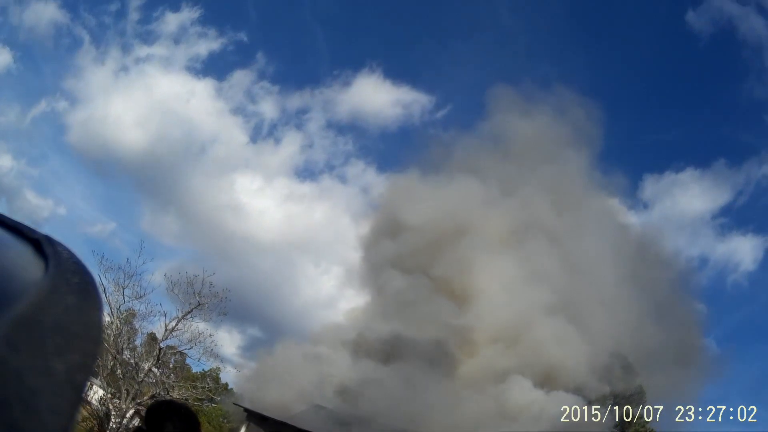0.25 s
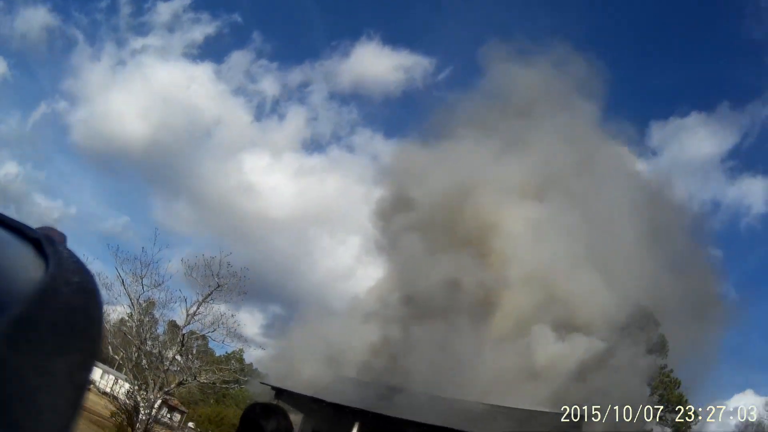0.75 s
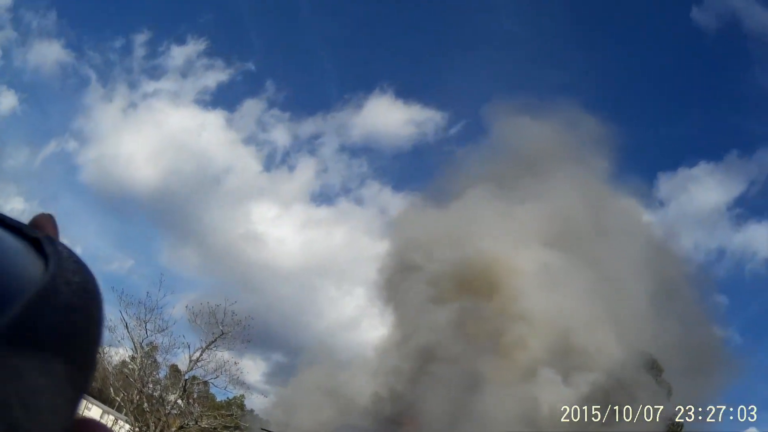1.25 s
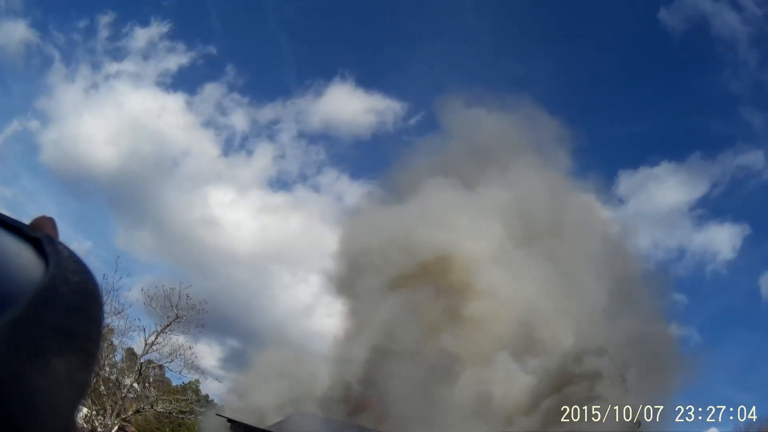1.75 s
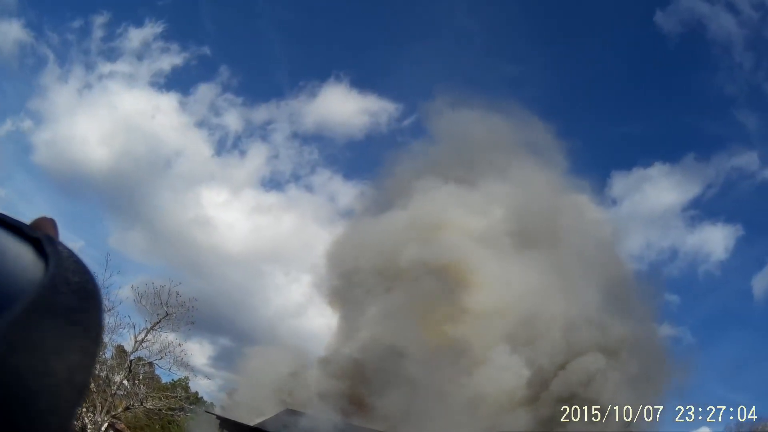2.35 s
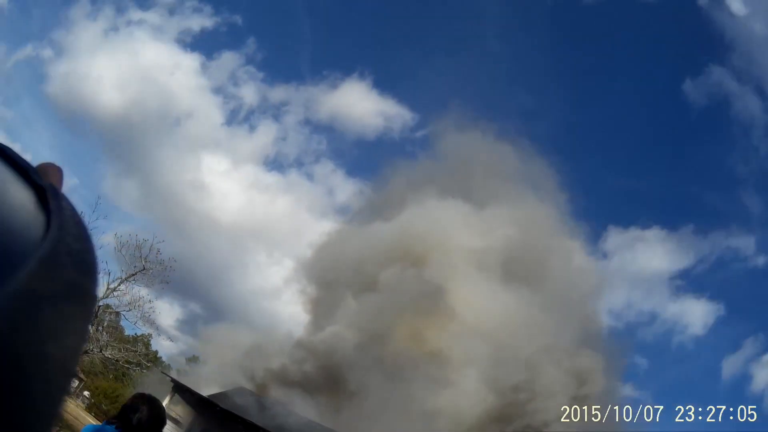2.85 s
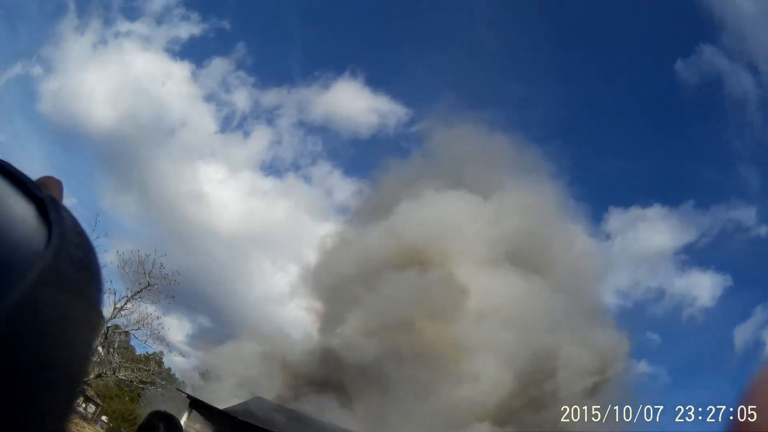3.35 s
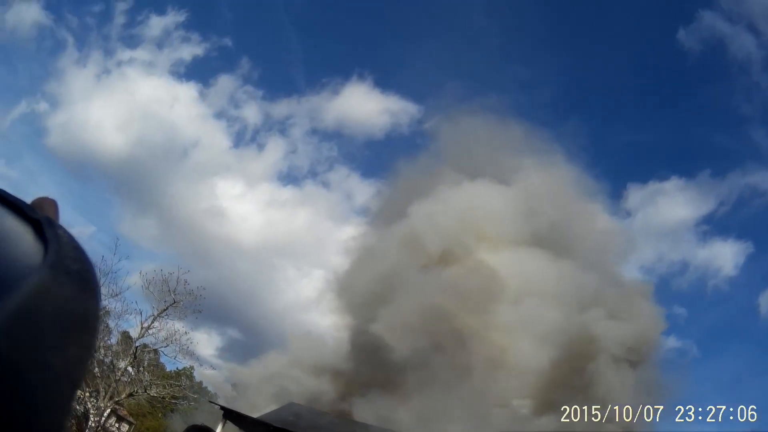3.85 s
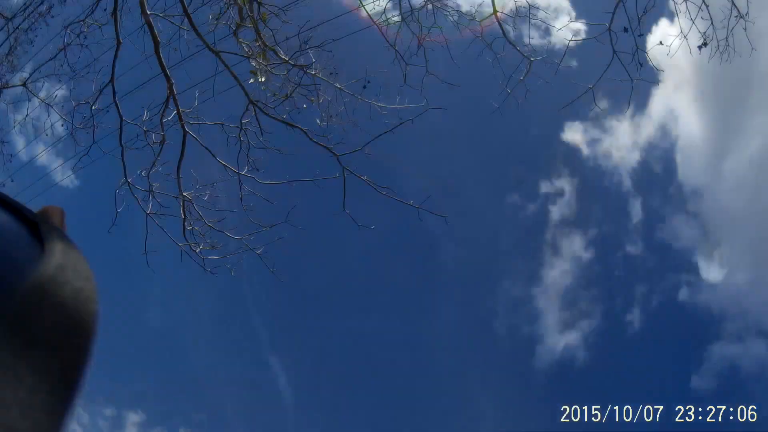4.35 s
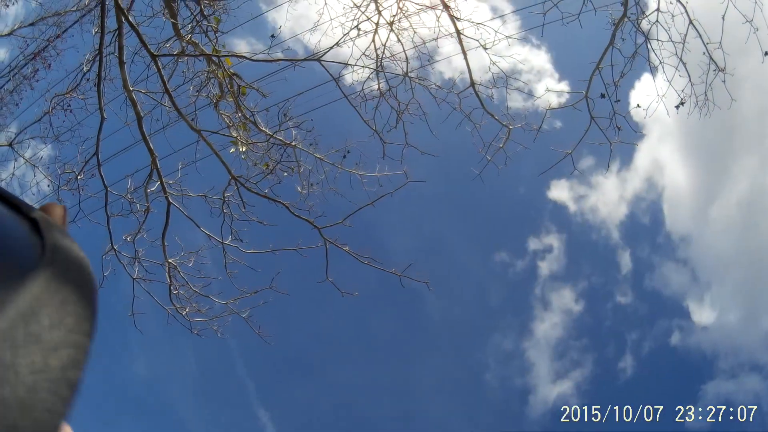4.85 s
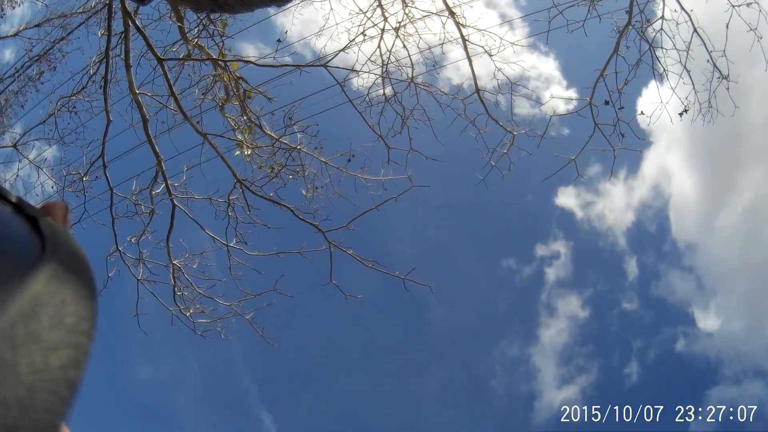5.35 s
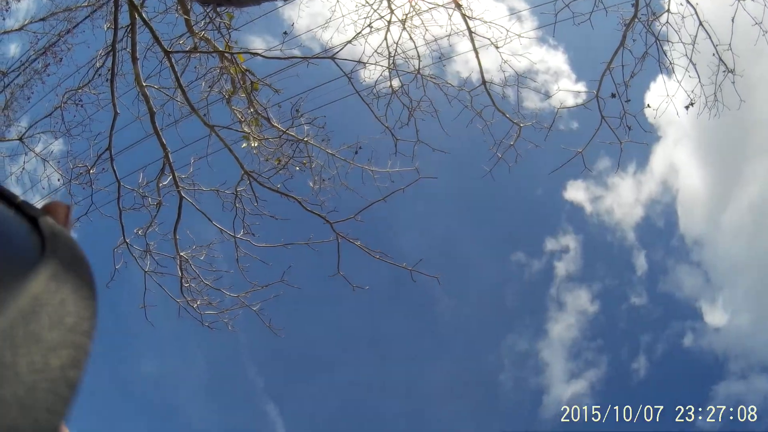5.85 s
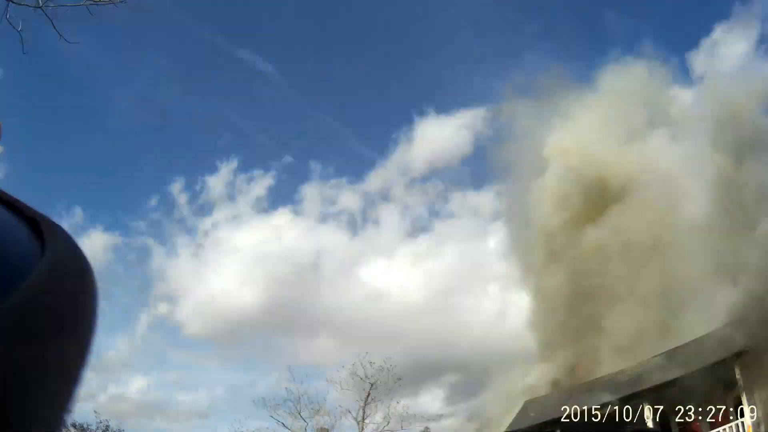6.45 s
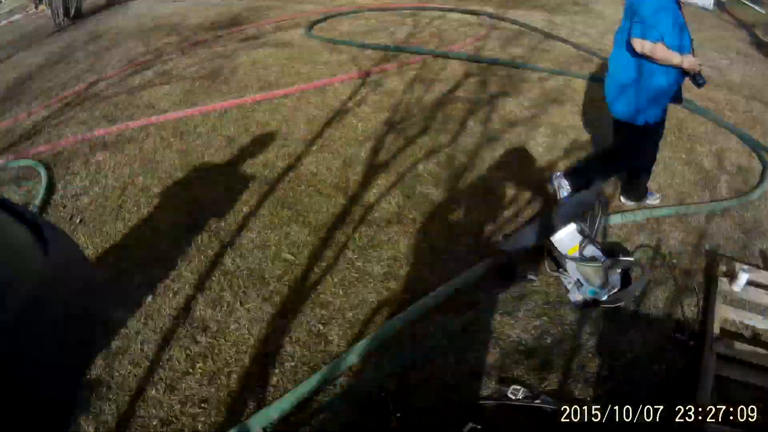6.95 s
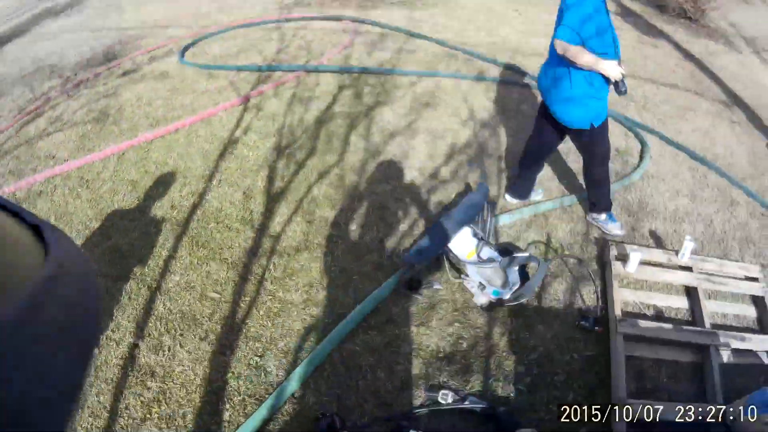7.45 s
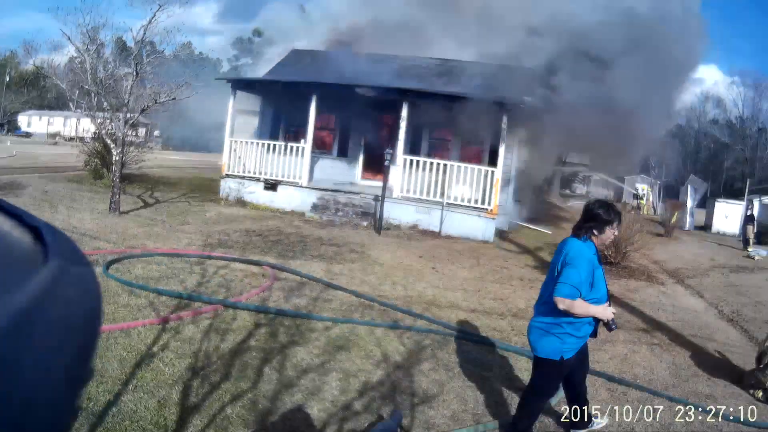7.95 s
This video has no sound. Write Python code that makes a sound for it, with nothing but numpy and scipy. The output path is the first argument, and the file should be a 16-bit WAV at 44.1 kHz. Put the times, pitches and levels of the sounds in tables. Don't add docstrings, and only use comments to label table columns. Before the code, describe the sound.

Steady low diesel hum and boxy roar of a pumping fire engine, with sharp gloved knocks, clicks and a hard snap right at the microphone.

```python
import sys
import numpy as np
from scipy import signal
from scipy.io import wavfile

SR = 44100
rng = np.random.default_rng(int(sys.argv[2]) if len(sys.argv) > 2 else 0)


def materialize(psi):
    bounded = np.clip(np.atleast_2d(psi).T, -1, 1)
    quanta = np.round(bounded * 32767).astype(np.int16)
    wavfile.write(sys.argv[1], SR, quanta)


def rack_gain(trim_db):
    fader = np.asarray(trim_db, float)
    return 10 ** (fader / 20)


N = 362061

# (f/Hz, width/Hz, level/dB)
LOW_CAVITY = [(1080, 336, 7.5), (1377, 375, 12.5), (1539, 252, 14), (1946, 680, -5.5)]


def rms_one(x):
    return x / np.sqrt(np.mean(x ** 2) + 1e-20)


def in_time(rows):
    s, *columns = np.transpose(rows)
    return [np.interp(np.arange(N) / SR, s, c) for c in columns]


def drift(rate):
    r = np.exp(-80 * np.pi * rate / SR)
    steps = rng.standard_normal(N // 40 + 2002)
    slow = signal.lfilter([1], [1, -2 * r, r * r], steps)[2000:]
    return np.interp(np.arange(N) / 40, np.arange(len(slow)), rms_one(slow))


def resonate(x, hz, width_hz):
    r = np.exp(-np.pi * width_hz / SR)
    zeros = np.array([1, 0, -1]) * (1 - r * r) / 2
    poles = [1, -2 * r * np.cos(2 * np.pi * hz / SR), r * r]
    return signal.lfilter(zeros, poles, x)


def cavity(x, modes):
    return sum((-1) ** k * rack_gain(db) * resonate(x + 1e-18, hz, width)
               for k, (hz, width, db) in enumerate(modes))


def band_pass(x, order, low_hz, high_hz):
    return signal.sosfilt(signal.butter(order, [low_hz, high_hz], "band", fs=SR, output="sos"), x)


def tone(hz, db, wobble_db, wander):
    phase = 2 * np.pi * np.cumsum(hz * np.ones(N)) / SR + wander * drift(2.34) + rng.uniform(0, 2 * np.pi)
    return np.sqrt(2) * rack_gain(db + wobble_db * drift(4.3)) * np.sin(phase)


def add(out, s, piece):
    at = round(s * SR)
    out[at:at + len(piece)] += piece[:N - at]


def grains(count, per_s, spread_db):
    hits = rng.random(count) < per_s / SR
    sizes = rack_gain(spread_db * np.minimum(rng.exponential(1, count), 3.5))
    return hits * sizes * rng.choice([-1, 1], count)


def under(s, db, sound):
    t = s[0] + np.arange(round((s[-1] - s[0]) * SR)) / SR
    return rack_gain(np.interp(t, s, db)) * rms_one(sound[:len(t)]) * signal.windows.tukey(len(t), .04)


def follow(mean_db, share):
    # (t/s, level/dB)
    facing = [(0.0, -54), (0.98, -54.5), (1.26, -50.5), (1.76, -50.5), (2.08, -54.5), (3.66, -50.5),
              (3.95, -54), (4.11, -48), (4.28, -44.5), (4.69, -49), (5.97, -47), (6.38, -48), (6.79, -47.5),
              (7.11, -49.5), (7.43, -50), (8.21, -49)]
    facing_db, = in_time(facing)
    return mean_db + share * (facing_db - facing_db.mean())


def engines():
    # (t/s, shaft turns/s, firing order level/dB)
    throttle = [
        (0, 22.6, -40),
        (.55, 22.8, -39),
        (1, 23, -39),
        (1.5, 24, -37.5),
        (2.2, 24.6, -36),
        (3.4, 24.9, -36),
        (4.6, 25.35, -37),
        (5.7, 25.65, -37),
        (8.21, 25.65, -39.5),
    ]
    # (multiple of shaft rate, level under firing/dB)
    upper_orders = [(4, -11), (5, -12), (6, -8), (7, -20), (8, -20), (9, -21), (10, -19), (12, -21),
                    (15, -23)]
    # (multiple of the hum, level under the hum/dB)
    hum_partners = [(.51, -5), (1.165, -11), (1.93, -17), (2, -19)]
    # (t/s, whine level/dB)
    gearbox = [(0, -60.5), (.85, -67), (1.2, -83), (3.5, -80), (4.0, -58.5), (4.25, -56), (5.1, -51.5),
               (6, -51.5), (6.4, -59), (6.8, -50), (7.1, -71), (7.6, -57), (8.21, -61)]
    hum_hz, whine_hz, low_whine_hz = 185.1, 1572.5, 1457

    shaft, firing_db = in_time(throttle)
    slack = shaft - 25.5
    bloom_db = 3.5 * np.exp(-(slack / 0.58) ** 2)
    out = tone(2 * shaft, -43 + 1.2 * slack + bloom_db, wobble_db=.5, wander=.06)
    out += tone(3 * shaft, firing_db, wobble_db=.4, wander=.05)
    for k, db in upper_orders:
        out += tone(k * shaft, firing_db + db, wobble_db=1.0, wander=0.037 * k)

    hum_db = follow(mean_db=-45, share=0.69) + 1.06 * (firing_db - firing_db.mean())
    out += tone(hum_hz, hum_db, wobble_db=1.03, wander=0.26)
    for k, db in hum_partners:
        out += tone(k * hum_hz, hum_db + db, wobble_db=3.5, wander=0.19)

    whine_db = in_time(gearbox)[0] + 2.8 * drift(14.0)
    out += tone(whine_hz, whine_db, wobble_db=2.0, wander=1.22)
    return out + tone(low_whine_hz, follow(mean_db=-66.5, share=3.1), wobble_db=4.0, wander=0.9)


def rumble(db, patchy_db):
    # (f/Hz, level per Hz/dB)
    spectrum = [(20, -13), (40, -13), (70, -12), (92, -6), (130, -3), (180, -6), (280, -12), (370, -13),
                (480, -24), (650, -33), (850, -30)]
    hz, level_db = np.transpose(spectrum)
    edges = 20 * 2 ** (np.arange(18) / 3)
    white = rng.standard_normal((2, N))
    out = 0
    for k, (low, high) in enumerate(zip(edges, edges[1:])):
        band = band_pass(white[k % 2], 2, low, high)
        middle_db = np.interp(np.log(low * high) / 2, np.log(hz), level_db)
        out = out + rack_gain(middle_db + patchy_db * drift(9.5)) * band
    return rack_gain(db) * rms_one(out)


def roar(roar_db, spray_db):
    # (f/Hz, width/Hz, level/dB)
    high_cavity = [(2390, 590, -8), (2977, 320, 9.5), (3380, 310, 6.5), (4400, 660, -4.5),
                   (5500, 390, -6.5), (6490, 400, -2), (8200, 900, -38)]
    gusts = 1.1 * drift(12)
    clatter = rms_one(cavity(rng.standard_normal(N), LOW_CAVITY))
    clatter = rack_gain(roar_db + gusts + 1.3 * drift(30)) * clatter
    spray = rms_one(cavity(rng.standard_normal(N), high_cavity))
    spray = rack_gain(spray_db + gusts + 1.1 * drift(30)) * spray
    bright = signal.sosfilt(signal.butter(2, 2600, "high", fs=SR, output="sos"), spray)
    return 0.96 * band_pass(clatter, 2, 850, 2300) + bright


def blow(peak_db, hz, width_hz, t60):
    t = np.arange(3000) / SR
    push = grains(count=3000, per_s=4900, spread_db=5.0) * rack_gain(-60 * t / max(t60, .004))
    push[:3] = -5
    once = resonate(push, hz, width_hz)
    ring = resonate(once, hz, 1.17 * width_hz) + 0.07 * once
    return rack_gain(peak_db) * ring / np.abs(ring).max()


def crack(peak_db, top_hz):
    t = np.arange(1500) / SR
    dying = rng.standard_normal(len(t)) * rack_gain(-60 * t / .017)
    burst = band_pass(dying, 3, 1500, top_hz)
    return rack_gain(peak_db) * burst / np.abs(burst).max()


def handling():
    # (t/s, peak level/dB, ring f/Hz, thud level/dB)
    knocks = [(0.4066, -39, 1550, -43), (0.6838, -36, 1400, -39.5), (0.8596, -56, 1080, -41),
              (1.034, -31.5, 1310, -30), (1.052, -32, 1190, -50), (1.1188, -28.5, 1470, -39),
              (1.157, -37, 1200, -45), (1.2063, -33, 1250, -47), (1.222, -31, 1330, -34.5),
              (1.2646, -34, 1220, -45), (1.565, -36, 1110, -45), (1.6999, -28, 1370, -41),
              (1.8517, -30, 960, -43), (1.8626, -24.5, 1570, -33), (4.132, -28, 1230, -40),
              (4.1667, -27.5, 1560, -34.5), (4.203, -34, 1420, -47), (4.275, -36, 1540, -42),
              (4.349, -25.5, 1390, -49), (4.387, -30, 1470, -57), (4.6393, -36.5, 1420, -48),
              (4.6644, -30.5, 1530, -45), (4.9511, -30.5, 1430, -44), (6.538, -32.5, 1520, -49),
              (6.7015, -29, 1130, -44), (6.7625, -29.5, 1420, -52), (7.166, -30, 1490, -39.5),
              (7.69, -33.5, 1440, -44), (8.0362, -30.5, 1140, -39), (8.155, -31.5, 1140, -43)]
    # (t/s, peak level/dB, ring f/Hz)
    ticks = [(2.7965, -49, 4870), (3.667, -48, 3020), (4.2323, -40, 2490), (4.3174, -50, 4800),
             (4.5377, -46, 6810), (4.6748, -46, 6340), (4.714, -42, 3380), (4.952, -43.5, 6940),
             (5.43, -49, 6350), (5.8668, -42, 3380), (5.8673, -43.5, 6560), (6.705, -39, 3200),
             (6.8584, -56, 3100), (7.0788, -56, 6400), (7.437, -44, 2740), (7.437, -47, 6800),
             (7.707, -37, 1560), (8.178, -45, 1890), (1.765, -53, 5000), (7.851, -49, 6000),
             (4.1614, -41, 8200), (4.1874, -30.5, 8000), (4.2044, -41, 6540), (4.2564, -46, 8340),
                  (4.2763, -36.5, 6840), (4.2991, -45, 6700), (4.3266, -49, 5590), (4.353, -34, 7160),
                  (4.3584, -36.5, 6650), (4.3684, -48, 6770), (4.3744, -49, 6690), (4.397, -41, 6900)]
    # (t/s, peak level/dB, top f/Hz)
    cracks = [(1.036, -50, 6000), (1.121, -45, 6000), (1.6993, -35, 6760), (1.865, -39, 13000),
              (1.873, -32.5, 12800), (4.187, -42, 12000), (4.205, -44, 11000), (4.27, -44, 10000),
              (4.299, -43, 13500), (4.304, -41, 13000), (4.665, -45, 6000), (7.167, -43, 7000)]
    # (t/s, peak level/dB, f/Hz)
    thumps = [(0.699, -26.5, 56), (1.843, -30, 44.3), (1.846, -24, 262), (1.853, -32, 298),
              (1.902, -41, 225), (5.744, -34, 304), (6.65, -42, 40), (1.696, -28, 320), (7.39, -34, 302),
              (7.42, -43, 40)]

    out = np.zeros(N)
    for s, db, hz, thud_db in knocks:
        t60 = 0.047 * rack_gain(0.12 * (thud_db + 46))
        add(out, s, blow(db, hz, 480, t60) + blow(thud_db, 550, 156, t60))
    knock_ticks = [(s, db - 31, 2880) for s, db, *_ in knocks]
    for s, db, hz in ticks + knock_ticks:
        add(out, s, blow(db, hz, 0.2 * hz, t60=0.027))
    for s, db, top_hz in cracks:
        add(out, s, crack(db, top_hz))
    for s, db, hz in thumps:
        t = np.arange(round(1.8 * SR / hz)) / SR
        add(out, s, rack_gain(db) * np.hanning(len(t)) * np.sin(2 * np.pi * hz * t))
    return out


def rubbing():
    # (peak t/s, length/s, cavity level/dB, rustle over it/dB, body over it/dB)
    strokes = [(0.712, 0.18, -49.5, -13.5, 1.5), (0.883, .1, -57, -11, -12), (1.166, 0.13, -49.5, -18, -2),
               (1.225, 0.023, -42.5, -13.5, -6), (1.272, 0.14, -60, -15, 1), (1.723, 0.088, -56.5, 0, -3),
               (1.798, 0.17, -55, -8, -7), (1.857, 0.038, -48, -1, 12), (2.466, 0.13, -50.5, -10, -13),
               (2.694, 0.4, -48.5, -20, -5.5), (4.139, 0.11, -49, -8, 4), (4.205, 0.15, -39, -15.5, -8),
               (4.3, 0.11, -44.5, -11.5, 0), (4.363, .1, -39.5, -17, 2.5), (4.534, 0.095, -54, -6, -25),
               (5.302, .5, -47, -26, -24), (4.949, 0.13, -47, -19, -9), (1.043, .025, -42, -25, 2),
               (6.514, 0.49, -51.5, -14.5, -9), (6.708, 0.091, -44, -11, -10), (6.852, 0.4, -46, -16, -5),
               (7.1, 0.081, -60, -3, 12.5), (7.4, 0.25, -58, -22, 10.5)]
    # (f/Hz, width/Hz, level/dB)
    rustle_modes = [(3200, 94, 12.5), (4800, 400, -0.5), (6800, 140, 1.5), (8200, 1100, -12)]
    edge_db = -36.5

    out = np.zeros(N)
    slips = grains(count=N, per_s=1600, spread_db=4.0) * rack_gain(3.0 * drift(40))
    hollow = cavity(slips, LOW_CAVITY)
    rustle = cavity(slips, rustle_modes)
    body = resonate(resonate(slips, 458, 164), 370, 500)
    for peak, length, db, rustle_db, body_db in strokes:
        s = peak + length * np.array([-1, 0, 1])
        shape_db = db + edge_db * np.array([1, 0, 1])
        for layer, over_db in ((hollow, 0), (rustle, rustle_db), (body, body_db)):
            add(out, s[0], under(s, shape_db + over_db, layer[round(s[0] * SR):]))
    return out


def strap():
    # (t/s, length/s, f/Hz, width/Hz, level/dB)
    squeaks = [(1.267, 0.021, 8200, 150, -62), (1.843, .014, 5600, 700, -56),
               (2.656, 0.036, 4930, 900, -70), (2.67, 0.024, 7000, 1500, -70), (4.095, .06, 4800, 500, -64),
               (2.79, .02, 4850, 200, -65), (3.44, 0.027, 4800, 201.3, -69), (4.32, .012, 5500, 300, -60),
               (6.69, .025, 4770, 600, -57), (7.365, 0.047, 3450, 200, -61.5), (7.377, .03, 4100, 250, -69),
               (7.418, .014, 7500, 150, -66), (7.429, 0.029, 8200, 200, -58),
               (7.733, 0.042, 3480, 700, -56.5), (7.733, 0.023, 4140, 700, -62)]
    # (t/s, peak level/dB)
    kicks = [
        (7.765, -38),
        (7.809, -43),
        (7.824, -44),
    ]
    creak_hz, creak_t60_s, grip_s = 1074, 0.21, 7.838

    out, t = np.zeros(N), np.arange(N) / SR
    for s, length, hz, width, db in squeaks:
        narrow = resonate(resonate(rng.standard_normal(4000), hz, width), hz, width)
        stick = narrow[1000:1000 + round(length * SR)]
        add(out, s, rack_gain(db) * rms_one(stick) * signal.windows.tukey(len(stick), .3))

    swell = sum(rack_gain(db - 60 * np.abs(t - s) / creak_t60_s) * np.clip((t - s) / 0.0014, 0, 1)
                for s, db in kicks)
    grip = np.clip((grip_s - t) / 0.0068, 0, 1)
    rough = rack_gain(2.1 * drift(90))
    return out + swell * grip * rough * np.sin(2 * np.pi * creak_hz * t + 0.66 * drift(90))


def buckle():
    # (f/Hz, width/Hz, level/dB)
    modes = [(805, 180, -5), (1160, 120, -4.5), (1490, 80, 13), (1760, 270, 5.5), (2100, 150, 3),
             (2420, 110, -2), (3100, 260, -1), (3700, 200, -1.5), (4850, 210, 4), (5670, 230, -3.5),
             (6400, 320, -10), (8200, 270, -12), (10000, 870, -32)]
    # (t/s, peak level/dB)
    snap = (1.8726, -12)
    treble_loss_db = 66

    out, t = np.zeros(N), np.arange(8000) / SR
    s = np.cumsum([1.875, 0.016, 0.016, 0.037])
    db = np.cumsum([-29, 0, -8.5, -25])
    shakes = grains(count=8000, per_s=2200, spread_db=3.5)
    rattle = 0
    for k, mode in enumerate(modes):
        fading = shakes * rack_gain(-treble_loss_db * mode[0] / 1000 * t)
        rattle = rattle + (-1) ** k * cavity(fading, [mode])
    add(out, s[0], under(s, db, rattle))

    push = np.r_[np.hanning(7), np.zeros(3000)]
    hit = cavity(push, [(hz, 1.8 * width, level) for hz, width, level in modes])
    add(out, snap[0], rack_gain(snap[1]) * hit / np.abs(hit).max())
    return out


def scene():
    far = engines() + rumble(follow(mean_db=-41, share=0.32), patchy_db=2.0)
    far += roar(follow(mean_db=-51, share=0.87), follow(mean_db=-65, share=.6))
    hand = handling() + rubbing() + strap() + buckle()
    return (far + hand)[None]


def band_limit(x):
    return signal.sosfilt(signal.butter(12, 16270, fs=SR, output="sos"), x)


def record(dry):
    dulled = signal.sosfilt(signal.butter(2, 13500, fs=SR, output="sos"), dry)
    self_noise_db = -71.5
    hiss = rack_gain(self_noise_db + 6.5) * rng.standard_normal(dry.shape)
    cut = signal.sosfilt(signal.cheby2(14, 60, 15950, fs=SR, output="sos"), dulled + hiss)
    return band_limit(cut)


dry = scene()
out = record(dry)
materialize(out)
```